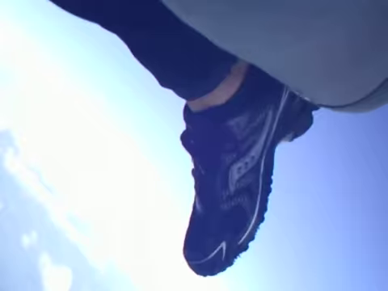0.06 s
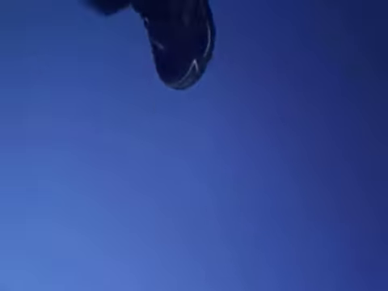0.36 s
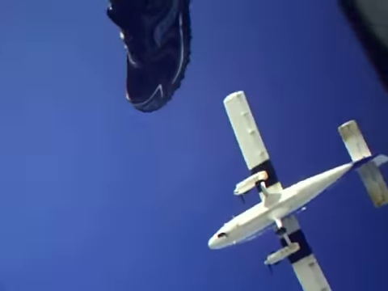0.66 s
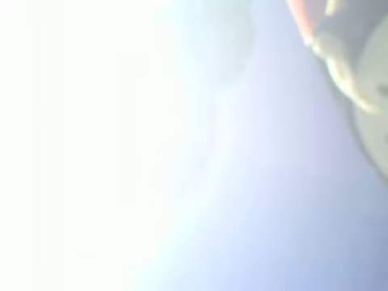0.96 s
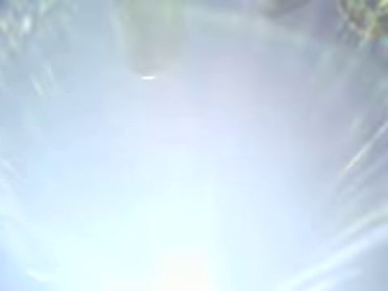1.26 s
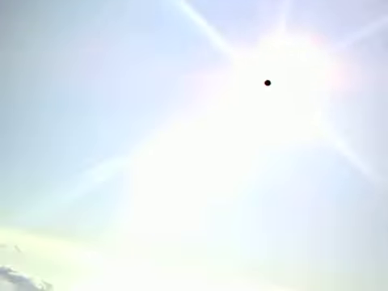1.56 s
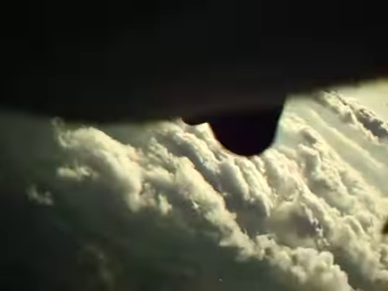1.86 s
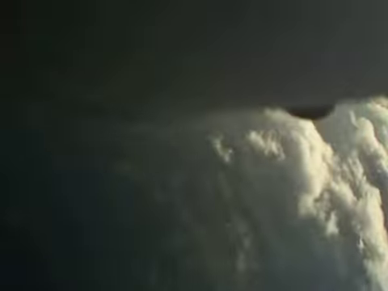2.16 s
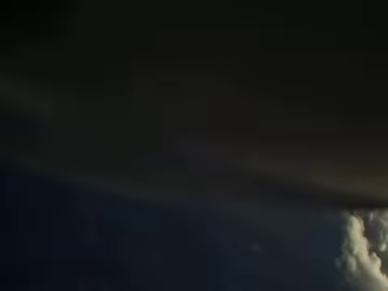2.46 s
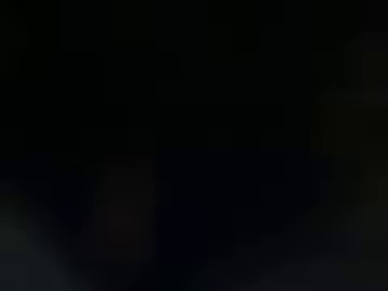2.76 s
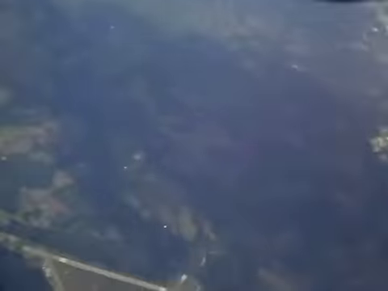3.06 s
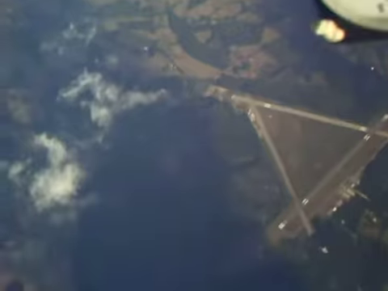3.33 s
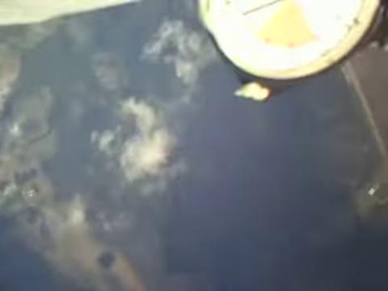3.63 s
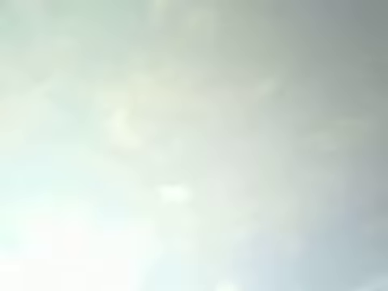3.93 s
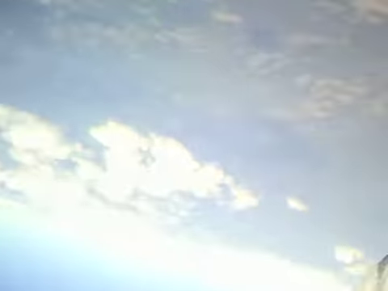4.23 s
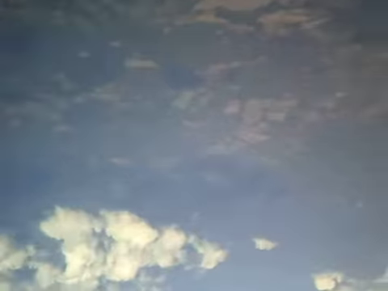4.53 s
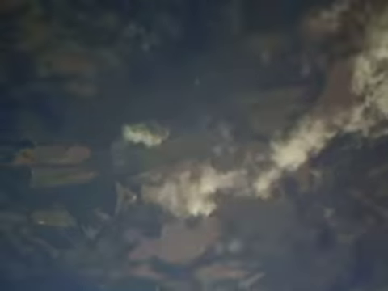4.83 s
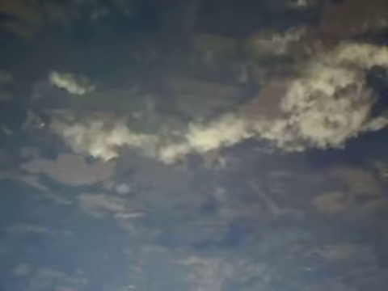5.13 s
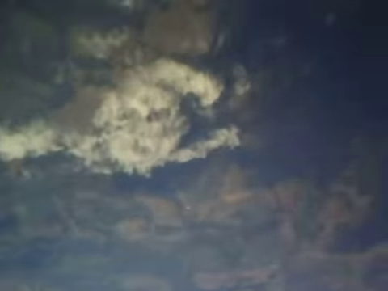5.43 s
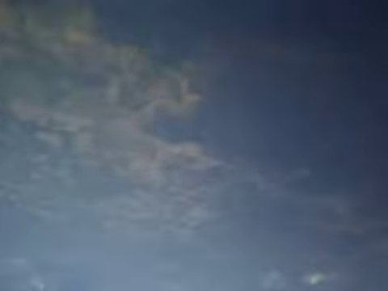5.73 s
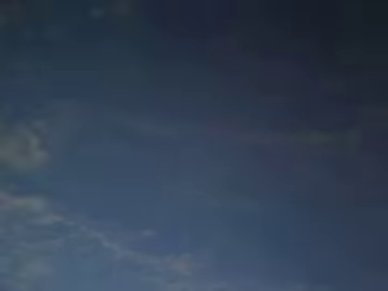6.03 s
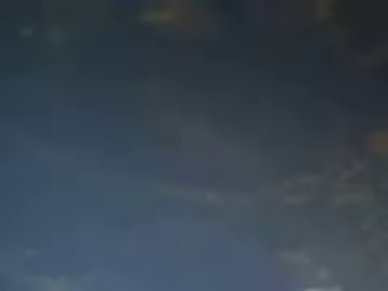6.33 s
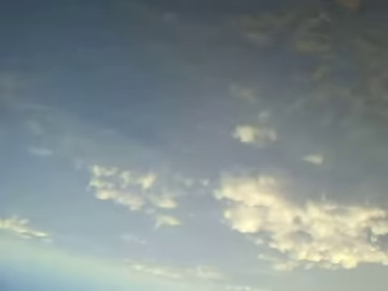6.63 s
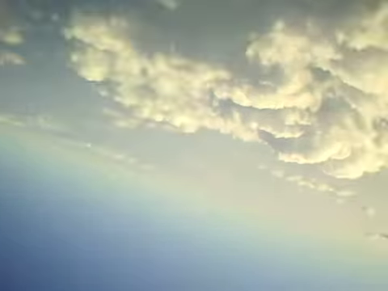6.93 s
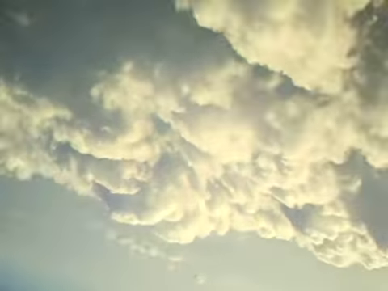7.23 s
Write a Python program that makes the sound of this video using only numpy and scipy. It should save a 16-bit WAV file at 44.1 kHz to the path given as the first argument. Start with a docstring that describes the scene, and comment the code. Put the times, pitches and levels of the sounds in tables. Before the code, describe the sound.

Gusts of rumbling, hissing wind buffet a skydiver's microphone, briefly choking it before settling into a loud, constant rush.

```python
"""Wind rushing over a small camera's microphone in free fall: open air, no distance, right on the port.
It comes in lurches while the body tumbles, then more evenly. The port hisses in two resonances while
large eddies press the diaphragm to the end of its travel, which chops the hiss; the hardest blasts
pin it there and leave only a thump and a short silence. Mono, through the camera's narrow voice band."""
import sys
import numpy as np
from scipy import signal
from scipy.fft import rfft, irfft, next_fast_len
from scipy.io import wavfile
from scipy.ndimage import map_coordinates

SR = 44100
rng = np.random.default_rng(int(sys.argv[2]) if len(sys.argv) > 2 else 0)


def unload_audio(sound):
    """Save the sound as a 16-bit wav file, at the path given as the first command line argument."""
    columns = np.transpose(np.atleast_2d(sound))
    # keep every value between -1 and 1, then stretch to whole-number steps
    steps = np.round(np.clip(columns, -1, 1) * 32767)
    wavfile.write(sys.argv[1], SR, steps.astype(np.int16))


N = 325899

# spectrum of air hissing in the microphone port: frequency_hz, density_db
PORT_HISS = [(100, -17.5), (600, -8.5), (1200, -8.5), (1700, -6), (2100, -1), (2430, -1.5), (2850, -4),
             (3350, 0.5), (3700, -10), (4300, -21), (7000, -78)]


def airstream(flutter_db, flutter_hz, gust_db, gust_hz):
    """Air tearing over the camera housing: low buffeting, a roar, and the hiss of the port."""
    # flow across the port, swinging as the body tumbles, then levelling off: time_s, level_db
    flow = [(0, -32), (.45, -30.5), (1.28, -21), (1.68, -25.5), (1.95, -18), (2.17, -13.5), (2.5, -12),
            (2.6, -18), (3.3, -19.5), (3.43, -11), (3.68, -17), (3.87, -10.5), (4.75, -9.5), (5.0, -4),
            (5.06, -11.5), (5.95, -5), (6.62, -8), (7.39, -6.5)]
    # small eddies that buffet the port: time_s, level_db
    churn = [(0, -15), (1.15, -22), (1.4, -17), (1.62, -31), (2.0, -20), (2.4, -23), (2.97, -15),
             (3.25, -31.5), (3.9, -24.5), (4.3, -6), (4.95, -10), (5.28, -8), (5.95, -10), (6.78, -9),
             (7.39, -13)]
    # spectrum of their buffeting: frequency_hz, density_db
    buffet_spectrum = [(15, -28), (40, -2.5), (75, 3.5), (150, -4), (250, -14.5), (450, -27.5), (1500, -73)]
    # spectrum of the roar over the housing: frequency_hz, density_db
    roar_spectrum = [(60, -38.5), (150, 0), (270, 4), (450, -2), (750, -5.5), (1400, -12), (3000, -10.5),
                     (7000, -63)]
    flow_db = timeline(flow) + gust_db * wobble(gust_hz)
    roar_db = -15 + 0.55 * flow_db  # grows more slowly than the hiss, so more flow is brighter
    steady_power = amp([timeline(churn), roar_db, flow_db]) ** 2
    buffet_gain, roar_gain, hiss_gain = np.sqrt(steady_power + surge_power())
    flutter = amp(flutter_db * wobble(flutter_hz))  # the local air speed never holds still
    buffet = buffet_gain * turbulence(buffet_spectrum)
    roar = roar_gain * turbulence(roar_spectrum)
    hiss = hiss_gain * port_hiss(whistle_db=-10, waver_db=1.5, waver_hz=25)
    return buffet + flutter * (roar + hiss)


def port_hiss(whistle_db, waver_db, waver_hz):
    """Air crossing the port hisses, with a breathy whistle that comes and goes."""
    whistle_gain = amp(whistle_db + waver_db * wobble(waver_hz))
    whistle = whistle_gain * resonance(centre_hz=2419.0, width_hz=225, size=N)
    return turbulence(PORT_HISS) + whistle


def surge_power(attack_s=0.019, release_s=0.023):
    """Power that surges of air add to buffet, roar and hiss: each rises, holds and dies away."""
    # surges, first the slipstream at the jump: start_s, hold_s, buffet_db, roar_db, hiss_db
    surges = [(0.037, 0.021, -9, -30, -31.5), (0.373, 0.24, -6.5, -26.5, -32.5), (.66, .05, -8, -11, -14),
              (0.752, 0.28, -8, -6, -7.5), (1.075, .04, -23, -23, -10), (1.149, .08, -38, -25, -15.3),
              (1.33, 0.17, -18.5, -26, -35.5), (1.768, 0.011, -19, -41, -24), (4.29, .16, -13, -17, -18),
              (6.318, 0.061, -20.5, -27, -7)]
    t = np.arange(N) / SR
    power = np.zeros((3, N))
    for start, hold, *levels_db in surges:
        rise = np.maximum(start - t, 0) / attack_s
        fall = np.maximum(t - start - hold, 0) / release_s
        power += amp(levels_db)[:, None] ** 2 * np.exp(-(rise + fall) ** 2)
    return power


def wake(edge_s, tear_db):
    """Slow, huge pressure swings; a blast overrides them, and the air tears as its front arrives."""
    # slow eddies shed by the falling body: time_s, level_db
    eddy_levels = [(0, -13.5), (1.2, -14), (1.7, -17), (2.2, -10.5), (2.7, -12.5), (3.6, -11.5),
                   (4.15, -10.5), (5.0, -7), (7.4, -5.5)]
    # spectrum of their pressure: frequency_hz, density_db
    eddy_spectrum = [(2, -28.5), (8, 4), (20, -7), (40, -8.5), (80, -19.5), (200, -40.5), (600, -83)]
    # blasts that hold the diaphragm to one side: start_s, length_s, signed_pressure
    blasts = [(3.001, 0.0052, 1), (3.137, .012, -1.4), (3.270, 0.017, -0.96), (3.486, 0.0077, 1),
              (3.56, 0.0045, 1.5), (3.608, .018, -4.5), (3.633, .021, 4.5), (3.658, .017, -4.5),
              (3.704, 0.0051, -1.2), (3.793, 0.014, 1.6), (3.832, 0.026, -1.27), (3.929, .008, 1.6),
              (3.949, 0.024, -2.5), (3.975, 0.024, 0.63), (4.037, .015, 3), (4.077, .044, -5.0),
              (4.124, .009, 4.0), (4.137, 0.02, 1.55), (4.216, .006, 1.3), (4.483, .006, -2.5),
              (5.348, .011, -1.43), (6.134, 0.0046, -2.6)]
    t = np.arange(N) / SR
    pressure = amp(timeline(eddy_levels)) * turbulence(eddy_spectrum)
    fronts = np.zeros(N)
    for start, length, push in blasts:
        edge = edge_s / abs(push)  # the harder the blast, the steeper its front
        near = slice(int((start - 3 * edge) * SR), int((start + length + edge) * SR))
        since = t[near] - start
        held = np.clip(np.minimum(since, length - since) / edge + 1, 0, 1) ** 3
        pressure[near] += held * (push - pressure[near])
        fronts[near] += abs(push) * np.exp(-(since / edge + 1) ** 2) * (1 - held)
    return pressure + amp(tear_db) * fronts * turbulence(PORT_HISS)


def edge_whistles():
    """The air catches the edge of the port and whistles for an instant."""
    # whistles: peak_s, sigma_s, pitch_hz, level_db
    whistles = [(1.238, 0.011, 2860, -11), (2.496, 0.0065, 2520, -2.5), (2.769, 0.006, 2560, -11),
                (2.976, 0.0066, 2450, -7.5), (3.501, 0.0043, 2540, -10), (3.908, 0.0089, 2600, -6),
                (5.96, .05, 2056, -9.5)]
    return swells(whistles, width_hz=520)


def air_puffs():
    """Single low puffs of air land on the microphone."""
    # puffs: peak_s, sigma_s, pitch_hz, level_db
    puffs = [(1.26, 0.017, 100, -10.5), (2.418, 0.013, 275, -13.5), (2.62, 0.007, 107, -3.5),
             (2.92, 0.059, 196, -19), (3.178, 0.0072, 220, -14), (3.592, .013, 105, -1.5),
             (5.08, .025, 49.6, -5), (5.28, .03, 105, -6.5), (6.8, 0.017, 81, -4)]
    return swells(puffs, width_hz=110)


def swells(rows, width_hz):
    """Short bell-shaped swells of narrow noise, each at its own pitch."""
    track = np.zeros(N + SR)
    half = SR // 8
    t = np.arange(-half, half) / SR
    for peak_s, sigma_s, pitch_hz, level_db in rows:
        envelope = amp(level_db) * np.exp(-.5 * (t / sigma_s) ** 2)
        first = round(peak_s * SR) - half
        track[first:first + len(t)] += envelope * resonance(pitch_hz, width_hz, size=len(t))
    return track[:N]


def resonance(centre_hz, width_hz, size):
    """Noise of rms 1 ringing in one resonance."""
    b, a = signal.iirpeak(centre_hz, centre_hz / width_hz, SR)
    x = signal.lfilter(b, a, signal.lfilter(b, a, rng.standard_normal(size)))
    return x / np.std(x)


def turbulence(spectrum):
    """Random pressure of rms 1 with the given spectrum."""
    x = filtered(rng.standard_normal(N), lambda hz: gain_at(spectrum, hz))
    return x / np.std(x)


def wobble(rate_hz):
    """A smooth random curve with rate_hz knots a second."""
    knots = rng.standard_normal(N // 20)
    return map_coordinates(knots, [np.arange(N) * rate_hz / SR], mode="mirror")


def amp(db):
    """Decibels to gain."""
    return 10 ** (np.asarray(db) / 20)


def gain_at(spectrum, hz):
    """Gain at hz, between (frequency_hz, level_db) points on a log frequency axis."""
    frequency_hz, level_db = np.transpose(spectrum)
    return amp(np.interp(np.log(hz + 1), np.log(frequency_hz + 1), level_db))


def timeline(points):
    """One level per sample, between (time_s, level_db) points."""
    time_s, level_db = np.transpose(points)
    return np.interp(np.arange(N) / SR, time_s, level_db)


def filtered(x, response):
    """x through a complex frequency response."""
    size = next_fast_len(N + SR // 2)
    hz = np.fft.rfftfreq(size, 1 / SR)
    return irfft(rfft(x, size) * response(hz), size)[..., :N]


def scene():
    """The total pressure on the diaphragm."""
    rush = airstream(flutter_db=1.06, flutter_hz=43, gust_db=0.87, gust_hz=8)
    gusts = edge_whistles() + air_puffs()
    return (rush + wake(edge_s=0.0084, tear_db=-21) + gusts)[None]


def record(dry, travel=0.69, coupling_hz=81, headroom=0.79, ceiling=0.71, top_hz=15800):
    """The capsule saturates, a held pressure leaks away, the input overloads and the band is narrowed."""
    # the camera's narrow voice band: frequency_hz, gain_db
    voice_band = [(3400, -1), (3900, -2.5), (4300, -11.5), (4600, -27), (4950, -88.5)]
    capsule = travel * np.tanh(dry / travel)  # near the end of its travel it no longer follows the hiss
    coupled = filtered(capsule, lambda hz: 1j * hz / (coupling_hz + 1j * hz))
    overloaded = np.clip(coupled, -headroom, headroom)
    narrow = filtered(overloaded, lambda hz: gain_at(voice_band, hz))
    flattened = np.clip(narrow, -ceiling, ceiling)  # peaks are cut again and spit a little treble
    return filtered(flattened, lambda hz: hz < top_hz)


dry = scene()
out = record(dry)
unload_audio(out)
```